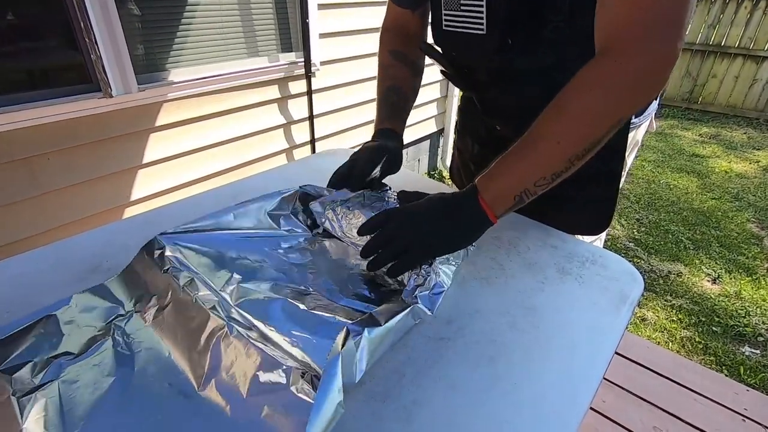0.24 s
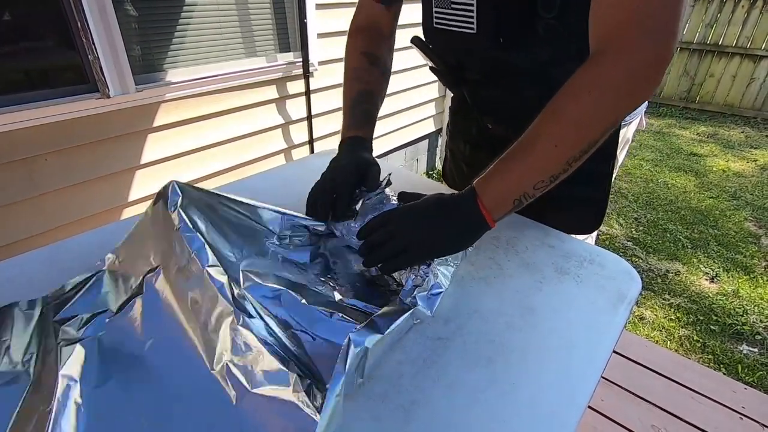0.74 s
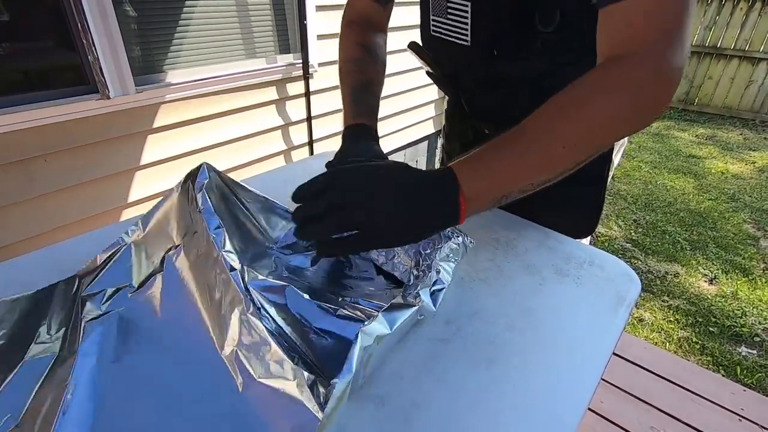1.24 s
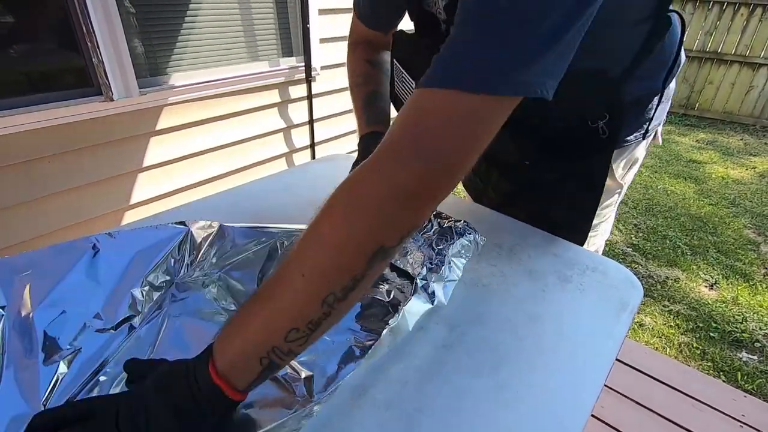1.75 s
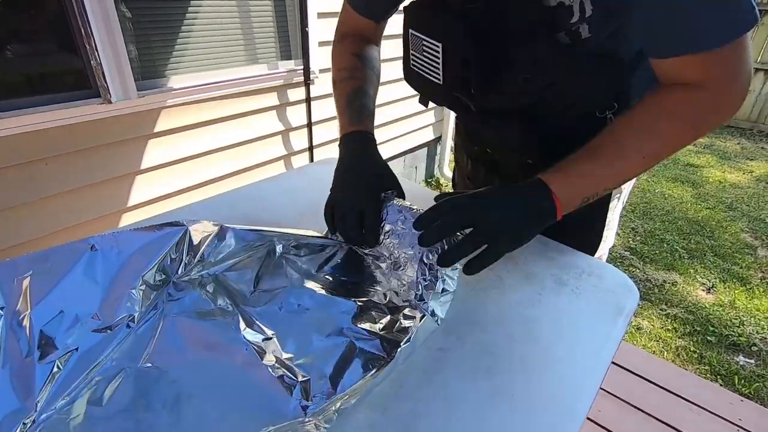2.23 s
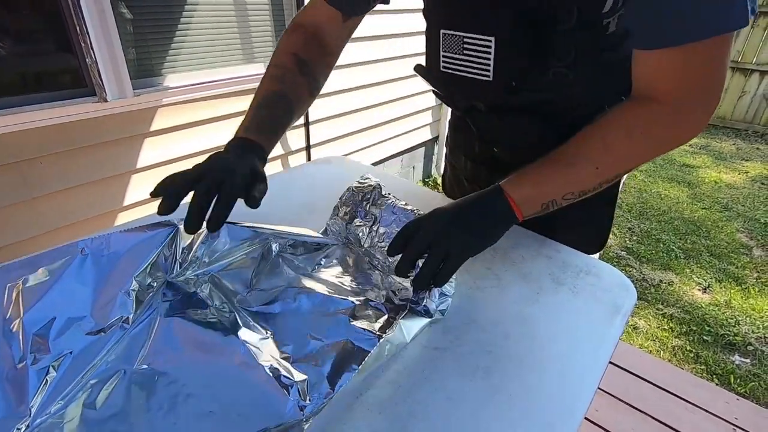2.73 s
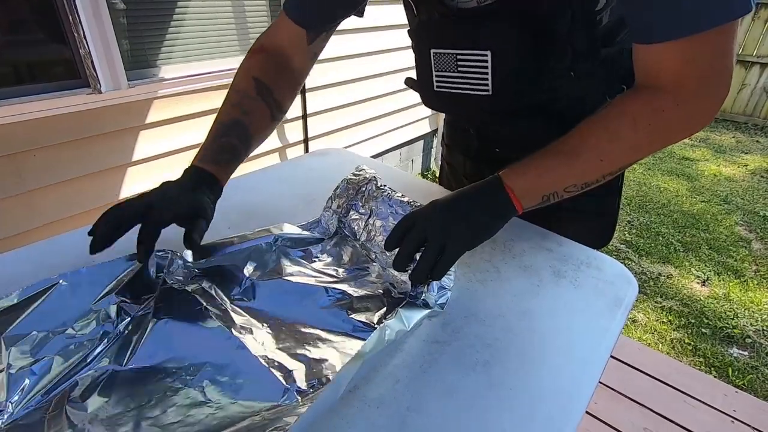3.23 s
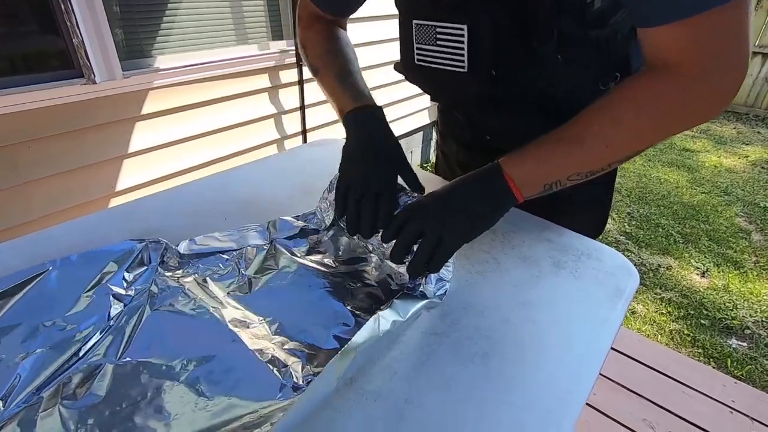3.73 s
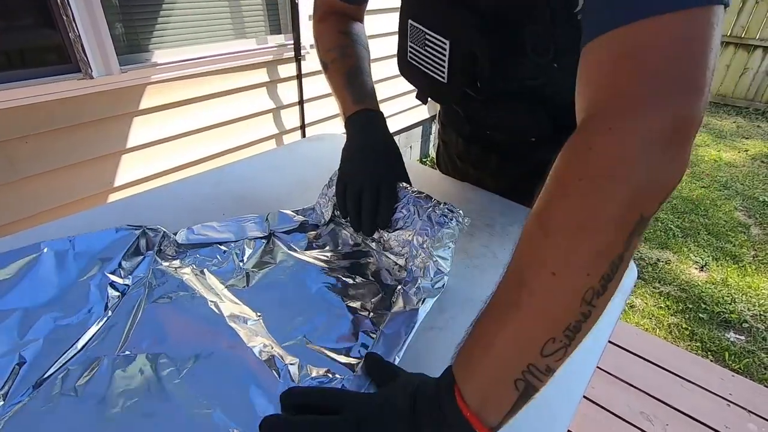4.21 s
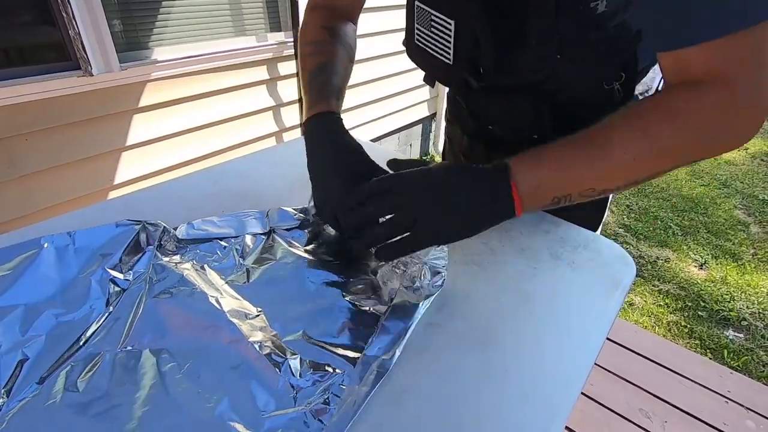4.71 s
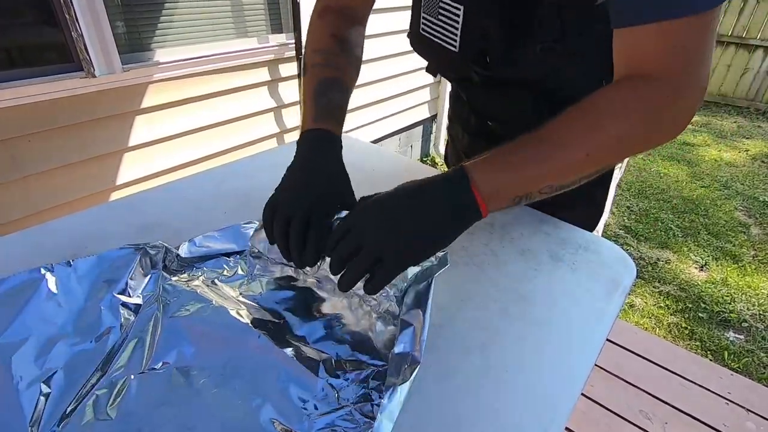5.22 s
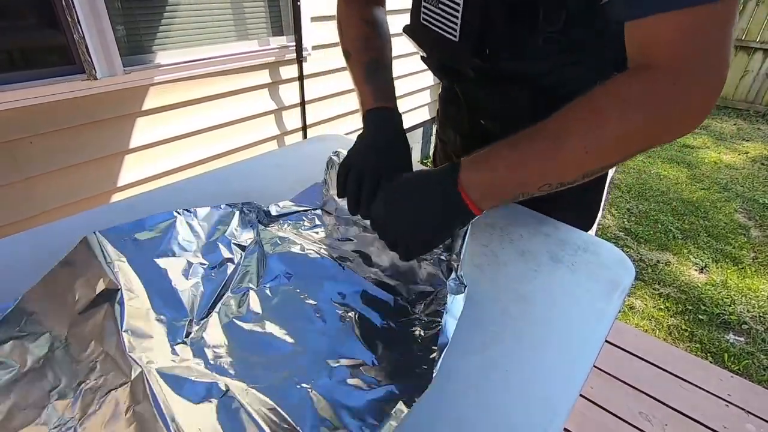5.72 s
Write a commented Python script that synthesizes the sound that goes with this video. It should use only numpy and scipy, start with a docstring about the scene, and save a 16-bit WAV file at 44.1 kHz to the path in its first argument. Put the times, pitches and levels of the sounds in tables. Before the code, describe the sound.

Aluminium foil crackles and crinkles in irregular bursts as it is folded and pressed on a hollow plastic table, over faint outdoor rumble.

```python
"""Outdoors, at a plastic table: gloved hands fold and press a sheet of aluminium foil around food.
Each press drives random damped pings (creases, facets, flexing sheet) and their diffuse shimmer.
Collapsing folds are noise sprays, snapping facets ringing cracks, single creases clicks, squeaks narrow noise.
The parcel bumps the table top, a bank of damped modes; a far machine hums in sines over rumbling noise."""
import sys
import numpy as np
from scipy import signal
from scipy.fft import rfft, irfft, next_fast_len
from scipy.io import wavfile
from scipy.ndimage import uniform_filter1d, map_coordinates

SR = 44100
rng = np.random.default_rng(int(sys.argv[2]) if len(sys.argv) > 2 else 0)


def int16_out(signal):
    """Quantize to a 16-bit WAV file."""
    q = np.round(np.clip(np.atleast_2d(signal).T, -1, 1) * 32767)
    wavfile.write(sys.argv[1], SR, q.astype(np.int16))


N = 262836  # samples

# hand presses or folds the foil, then lets it settle: start_s, rise_s, hold_s, release_db_per_s, level_db,
# slack_db (sheet flexing over creases), share_db (facets over their usual share)
PRESSES = [(0, 0.0023, 0.037, 160, -31, -3.5, 2.5), (.095, .06, .065, 170, -34, -7, -0.5),
           (.228, .035, 0.052, 148, -30.5, -2, .5), (0.349, .01, 0.028, 170, -30, -6, -1),
           (0.41, 0.021, .065, 130, -32.5, -4.5, 0), (.568, 0.055, .11, 150, -32, -7.5, 0.5),
           (0.776, .017, .075, 155, -20.5, -10.5, -1), (0.91, 0.031, 0.091, 103, -27, -7, 0),
           (1.08, 0.053, 0.2, 140, -32.5, -6, 0.5), (1.296, 0.039, 0.019, 120, -24, -9.5, -1),
           (1.385, 0.038, 0.045, 170, -30, -5.5, 1.5), (1.548, .009, 0.029, 182, -36, -4.5, 0),
           (1.652, .012, 0.13, 168, -23.5, -12, -1), (1.883, .1, .065, 148, -35, -9, 1.5),
           (2.09, 0.029, 0.047, 160, -39.5, -4, -3), (2.326, 0.023, 0.052, 150, -38.5, -6, -1.5),
           (2.433, 0.016, 0.08, 122, -37.5, 2, -.5), (2.634, 0.017, 0.031, 205, -46.5, 0.5, -.5),
           (2.929, 0.015, .021, 76.5, -25.5, -8.5, -1.5), (3.108, .04, 0.036, 130, -21.5, -9.5, 0.5),
           (3.213, .023, .068, 130, -33, -9, 2.5), (3.43, .05, .005, 170, -45, -1, 2),
           (3.526, 0.0071, .011, 193, -21.5, -11.5, -3.5), (3.593, 0.026, .016, 122, -33, -24, -1.5),
           (3.84, .025, .004, 350, -48, 8, 5), (3.866, 0.036, .004, 260, -36, -12.5, 0.5),
           (3.96, 0.046, .006, 338, -39.5, -5.5, 0.5), (4.165, 0.06, 0.028, 143, -24.5, -13, 2),
           (4.265, 0.047, 0.059, 173, -20.5, -21.5, -1), (4.44, 0.034, 0.0046, 330, -29, -18, 1.5),
           (4.525, 0.037, .025, 250, -46, -3, -1), (4.605, 0.0072, 0.0079, 200, -29.5, -14, -5),
           (4.728, .019, 0.12, 180, -49, -21, -3), (4.906, 0.042, 0.069, 162, -32, -12.5, -3.5),
           (5.018, .07, .041, 150, -30.5, -8, -1), (5.12, 0.041, .054, 140, -25, -8.5, -.5),
           (5.281, 0.0086, 0.0098, 220, -29, -6, -1.5), (5.338, 0.037, 0.074, 150, -37.5, -2.5, 0),
           (5.439, .14, 0.063, 80, -24, -8, -.5), (5.689, 0.083, .02, 170, -30, -0.5, 1),
           (5.813, 0.023, .11, 150, -37.5, -8.5, -1.5)]
# squeezed parcel sounds hollow: time_s, share_of_flexing (0-1)
HOLLOW = [(5.3, 0), (5.55, 0.36), (5.8, 0.6), (5.96, 0.02)]
# foil colour: freq_hz, relative_density_db
FOIL = [(120, -9), (200, 2), (258, -4.5), (293, -2.5), (378, -2.5), (596, 0), (1010, -3), (1400, -4.5),
        (1540, -3.5), (2290, 1.5), (3010, -2.5), (3890, 0.5), (10800, -2), (13600, -3), (15500, -18)]
# outdoor rumble colour: freq_hz, relative_density_db
YARD = [(15, -18), (35, -5), (60, -4), (160, 2), (260, -6.5), (700, -8), (1500, -20), (3000, -19.5),
        (13000, -32), (16000, -52)]
# distant machine partials: freq_hz, mean_peak_db
HUM = [(46.3, -55), (68.5, -53), (91.4, -50.5), (149, -53)]
# fold gives way in a run of buckles: start_s, level_db, t60_s, tilt_db_per_octave (on top of a base tilt)
FOLDS = [(0.044, -21.5, 0.13, -2), (0.142, -28, 0.06, 0.5), (0.3461, -18.5, 0.15, -2),
         (0.6973, -20.5, 0.17, 0), (0.7886, -22, 0.13, 11), (1.6632, -18, 0.46, -1),
         (1.99, -20.5, 0.098, -0.5), (2.2756, -31.5, 0.061, -2), (2.331, -35.5, 0.045, -5),
         (2.358, -26, 0.07, 1), (2.649, -30.5, 0.1, -4.5), (2.804, -38.5, 0.08, 0), (2.9392, -16, 0.11, 1),
         (3.087, -19, 0.08, -1), (3.248, -16, 0.1, 0.5), (3.537, -13, 0.083, -1), (4.1474, -28, 0.065, -2),
         (4.274, -13.5, 0.05, 2.5), (4.5602, -29, 0.033, -5), (4.6137, -12, 0.042, 0),
         (5.4275, -22.5, 0.039, -2.5)]
# foil rubs on foil: start_s, level_db, pitch_hz
SQUEAKS = [(0.183, -31, 11280), (0.438, -27.5, 8500), (.59, -33, 13000), (2.604, -36, 12000)]
# one facet snaps over: start_s, level_db, pitch_hz
SNAPS = [(0.243, -27, 700), (0.274, -22, 805), (0.465, -25.5, 2450), (1.433, -24.5, 746), (2.39, -29, 1917),
         (2.413, -25.5, 2200), (2.472, -19.5, 2030), (2.523, -26, 2300), (2.574, -33.5, 1500),
         (3.05, -25, 1130), (3.123, -23, 1800), (3.126, -24, 650), (4.009, -34, 1900), (4.105, -40, 3530),
         (4.149, -28, 3950), (4.182, -19.5, 2260), (4.258, -20, 3820), (4.597, -18.5, 2870),
         (4.788, -38.5, 1940), (4.823, -33.5, 1705), (5.282, -27, 1730)]
# table is bumped: start_s, level_db, dullness_hz (modes above it weaken)
BUMPS = [(1.695, -22, 130), (3.546, -19, 189), (3.566, -23, 166), (4.318, -25, 150), (4.342, -27, 150),
         (4.616, -13, 467), (4.641, -26, 480), (4.67, -35.5, 400)]
# table-top modes: freq_hz, level_db (before dulling), t60_s
TABLE_MODES = [(63.6, -8, 0.092), (106, -4, 0.05), (181.4, -5, 0.11), (231, -10.5, 0.16), (292, -2, 0.082),
               (369, 0.5, 0.061), (430, -9.5, 0.11)]
# stereo width: freq_hz, side_minus_mid_db
WIDTH = [(60, -23.5), (600, -21.5), (2500, -52.5), (12000, -41.5)]

TOP_HZ = 15500  # band limit
REST_DB, REST_SLACK_DB = -75, 13  # the foil never lies quite still
FIRM_DB = -22  # a firm press
FACET_DB, FACET_GROWTH = -25, 0.67  # facet level at a firm press; facet dB per crease dB
BROAD_SLACK_DB, BROAD_RANGE_DB = -4, 8  # slack at which half the facet power is broad; softness of the change
PARCEL_HZ, PARCEL_HALF_WIDTH_HZ = 518, 230
TICKS_PER_S = 45
TICK_DB, TICK_GROWTH, TICK_SPREAD_DB = -7.5, 0.68, 9  # offset, tick dB per rustle dB, range of sizes
SQUEAK_S, SQUEAK_HALF_WIDTH_HZ = 0.019, 550
SNAP_T60_S = 0.015  # of the crack


def amp(db):
    """Decibels to gain."""
    return 10 ** (np.asarray(db) / 20)


def unit(x):
    """x at rms 1."""
    return x / np.sqrt(np.mean(x ** 2) + 1e-20)


def along(points, hz):
    """(Hz, value) points read on a log axis."""
    f, v = np.transpose(points)
    return np.interp(np.log(hz + 1), np.log(f + 1), v)


def curves(rows):
    """One value per sample for each column after the time."""
    s, *cols = np.transpose(rows)
    return [np.interp(np.arange(N) / SR, s, col) for col in cols]


def fade(t, t60_s):
    """Exponential decay, 60 dB in t60_s."""
    return np.exp(-np.log(1000) * t / max(t60_s, 1e-3))


def wobble(knots_per_s):
    """Smooth random curve through normal knots."""
    knots = rng.standard_normal(int(N * knots_per_s / SR) + 4)
    return map_coordinates(knots, [np.arange(N) * knots_per_s / SR])


def filtered(x, response):
    """x times a response of frequency."""
    n = x.shape[-1]
    m = next_fast_len(n + 8192)
    return irfft(rfft(x, m) * response(np.fft.rfftfreq(m, 1 / SR)), m)[..., :n]


def add(track, s, sound):
    """Mix a sound into the track at time s."""
    part = track[max(round(s * SR), 0):][:len(sound)]
    part += sound[:len(part)]


def effort():
    """Press powers add over a rest level: dB of fine creases, larger facets and flexing sheet."""
    t = np.arange(0, N, 32) / SR
    start, rise, hold, release, level_db, slack_db, share_db = np.transpose(PRESSES)[:, :, None]
    swell = np.clip((t - start) / np.maximum(rise, 1e-3), 0, 1)
    release_s = np.maximum(t - start - rise - hold, 0)
    presses = swell * amp(level_db - release * release_s)

    def total_db(gains, rest_db):
        return 10 * np.log10((gains ** 2).sum(axis=0) + amp(rest_db) ** 2)

    fine_db = total_db(presses, REST_DB)
    extra_db = total_db(presses * amp(share_db), REST_DB) - fine_db
    facet_db = FACET_DB + FACET_GROWTH * (fine_db - FIRM_DB) + extra_db
    flex_db = total_db(presses * amp(slack_db), REST_DB + REST_SLACK_DB)
    return curves(np.transpose([t, fine_db, facet_db, flex_db]))


def buckles(rate, low_hz, high_hz, cycles, scatter_db, busy, size=256):
    """Tiny buckles at rms 1: damped pings of random pitch and size; busy (0-1) is the share of rate that occurs."""
    chance = rng.random((int(rate * N / SR), 4))
    start = (chance[:, :1] * N).astype(int)
    hz = low_hz + (high_hz - low_hz) * chance[:, 1:2]
    strength = amp(-scatter_db * np.log(np.maximum(chance[:, 2:3], .02)))
    occurs = (chance[:, 3:] < busy[start]) / np.sqrt(busy[start])  # mean power stays even
    turns = hz * np.arange(size) / SR
    ping = np.sin(2 * np.pi * turns) * np.exp(-turns / cycles)
    pings = occurs * strength * np.sqrt(hz) * ping
    samples = start + np.arange(size)
    return unit(np.bincount(samples.ravel(), pings.ravel(), N)[:N])


def shimmer(x, t60_s):
    """Energy lingers in countless modes: noise under the smeared energy of x, as strong as x."""
    decay = fade(np.arange(SR // 5) / SR, t60_s) ** 2
    energy = signal.fftconvolve(x ** 2, decay / decay.sum())[:N]
    return np.sqrt(np.abs(energy)) * rng.standard_normal(N)


def glinting(x, patchy_db, size=1024):
    """Facets ring briefly at changing pitches: random gains over time and frequency."""
    z = signal.stft(x, nperseg=size)[2]
    field = uniform_filter1d(rng.standard_normal(z.shape), size=5, axis=0)
    field = uniform_filter1d(field, size=3, axis=1)
    return signal.istft(z * amp(patchy_db * unit(field)), nperseg=size)[1][:N]


def voiced(grains, low_hz, high_hz, ring_db, t60_s):
    """Buckles and their shimmer in one band of the foil's colour, at rms 1."""
    def response(hz):
        band = 1 / np.sqrt((1 + (low_hz / (hz + 1)) ** 10) * (1 + (hz / high_hz) ** 10))
        return band * amp(along(FOIL, hz))

    direct = unit(filtered(grains, response))
    ring = unit(filtered(glinting(shimmer(grains, t60_s), patchy_db=2.5), response))
    return unit(direct + amp(ring_db) * ring)


def crinkling():
    """Small creases tick high and often; larger facets crackle lower; the sheet crumples softly."""
    fine_db, facet_db, flex_db = effort()
    # tight foil buckles in narrow, higher facets
    broad = 1 / (1 + np.exp((BROAD_SLACK_DB - (flex_db - fine_db)) / BROAD_RANGE_DB))
    hollow = np.clip(curves(HOLLOW)[0], 0, 1)
    busy = np.clip(amp(.8 * (fine_db - FIRM_DB)), .06, 1)  # harder work buckles more creases at once
    clumps_db = 0.59 * wobble(70)

    fine = buckles(rate=4000, low_hz=4800, high_hz=16900, cycles=0.99, scatter_db=0.0, busy=busy)
    narrow = buckles(rate=1300, low_hz=2550, high_hz=6500, cycles=0.53, scatter_db=3.5, busy=busy)
    wide = buckles(rate=600, low_hz=1200, high_hz=3320, cycles=1.5, scatter_db=2.0, busy=busy)
    flex = buckles(rate=700, low_hz=215, high_hz=1660, cycles=0.96, scatter_db=3.0, busy=busy, size=1024)

    creases = voiced(fine, 5340, 21600, ring_db=12.0, t60_s=0.068)
    broad_facets = voiced(wide, 1220, 3360, ring_db=10.5, t60_s=0.26)
    narrow_facets = voiced(narrow, 2800, 5770, ring_db=8, t60_s=0.23)
    facets = np.sqrt(broad) * broad_facets + np.sqrt(1 - broad) * narrow_facets

    def resonance(hz):
        return 1 / (1 + ((hz - PARCEL_HZ) / PARCEL_HALF_WIDTH_HZ) ** 4)

    parcel = unit(filtered(shimmer(flex, t60_s=0.12), resonance))
    open_sheet = voiced(flex, 228, 1860, ring_db=3.0, t60_s=0.69)
    sheet = np.sqrt(1 - hollow) * open_sheet + np.sqrt(hollow) * parcel
    return amp(clumps_db) * (amp(fine_db) * creases + amp(facet_db) * facets + amp(flex_db) * sheet)


def yard():
    """Steady outdoor rumble and the slightly unsteady hum of a distant machine."""
    t = np.arange(N) / SR
    air = unit(filtered(rng.standard_normal(N), lambda hz: amp(along(YARD, hz))))
    hum = np.zeros(N)
    for hz, db in HUM:
        level = amp(db + 0.69 * wobble(5.6))
        hum += level * np.sin(2 * np.pi * hz * t + 0.72 * wobble(5.2))
    return amp(-47.0) * air + hum


def ticks():
    """Single creases click, decaying bandpassed noise, clearest where the rustle is gentle."""
    fine_db, facet_db, _ = effort()
    out, t = np.zeros(N), np.arange(SR // 50) / SR
    for when, size, colour, life in rng.random((int(TICKS_PER_S * N / SR), 4)):
        at = int(when * N)
        rustle_db = (fine_db[at] + facet_db[at]) / 2
        hz = 1500 * 5 ** colour
        crease = signal.butter(1, [hz / 2, min(2 * hz, TOP_HZ)], "bandpass", fs=SR)
        noise = unit(signal.lfilter(*crease, rng.standard_normal(len(t))))
        click = noise * fade(t, .004 + .008 * life)
        level_db = TICK_DB + TICK_GROWTH * rustle_db + TICK_SPREAD_DB * size ** 2
        add(out, at / SR, amp(level_db) * click)
    return out


def folds():
    """Each collapsing fold is a sudden spray of buckles that dies away: decaying foil-coloured noise."""
    out, t = np.zeros(N), np.arange(SR // 4) / SR
    for s, db, t60_s, tilt_db in FOLDS:
        def response(hz):
            tilt = (tilt_db + 2.5) * np.log2((hz + 300) / 6000)
            return amp(along(FOIL, hz) + tilt)

        spray = unit(filtered(rng.uniform(-1, 1, len(t)), response))
        onset = 1 - np.exp(-t / 0.00067)
        add(out, s, amp(db) * spray * fade(t, t60_s) * onset)
    return out


def squeaks():
    """Brief narrow whistles where two layers slide: resonant noise under a smooth swell."""
    out, swell = np.zeros(N), np.hanning(int(SQUEAK_S * SR))
    for s, db, pitch_hz in SQUEAKS:
        def response(hz):
            return 1 / (1 + ((hz - pitch_hz) / SQUEAK_HALF_WIDTH_HZ) ** 2)

        whistle = unit(filtered(rng.standard_normal(SR // 8), response))
        add(out, s, amp(db) * whistle[:len(swell)] * swell)
    return out


def snaps():
    """A facet flips with a crack, rings for a few cycles and stirs the sheet around it."""
    out, t = np.zeros(N), np.arange(SR // 10) / SR
    for s, db, hz in SNAPS:
        facet = signal.butter(2, [.5 * hz, min(1.6 * hz, SR / 3)], "bandpass", fs=SR)
        crack = unit(signal.lfilter(*facet, rng.standard_normal(len(t))))
        ring = np.sin(2 * np.pi * hz * t) * fade(t, 0.61 * SNAP_T60_S)
        crack_fade = fade(t, SNAP_T60_S) + .08 * fade(t, .08)  # slow part: stirred sheet
        onset = 1 - np.exp(-t / .0002)
        add(out, s, amp(db) * (2.2 * ring + crack * crack_fade) * onset)
    return out


def bumps():
    """The hollow table top thuds in damped modes; a softer contact weakens the higher ones."""
    out, t = np.zeros(N), np.arange(SR // 3) / SR
    onset = 1 - np.exp(-t / 0.00052)
    for s, db, dull_hz in BUMPS:
        thud = np.zeros(len(t))
        for k, (hz, level_db, t60_s) in enumerate(TABLE_MODES):
            gain = (-1) ** k * amp(level_db) / np.hypot(1, (hz / dull_hz) ** 2)
            thud += gain * np.sin(2 * np.pi * hz * t) * fade(t, t60_s)
        add(out, s, amp(db) * thud * onset)
    return out


def scene():
    """Everything lies straight ahead; a faint quarter-turned side makes left and right differ in phase."""
    mid = crinkling() + yard() + ticks() + folds() + squeaks() + snaps() + bumps()
    side = filtered(mid, lambda hz: 1j * amp(along(WIDTH, hz)))
    return np.array([mid + side, mid - side])


def record(dry):
    """Low-pass: a 500 Hz wide linear slope centred on TOP_HZ."""
    return filtered(dry, lambda hz: np.clip((TOP_HZ + 250 - hz) / 500, 0, 1))


dry = scene()
out = record(dry)
int16_out(out)
```